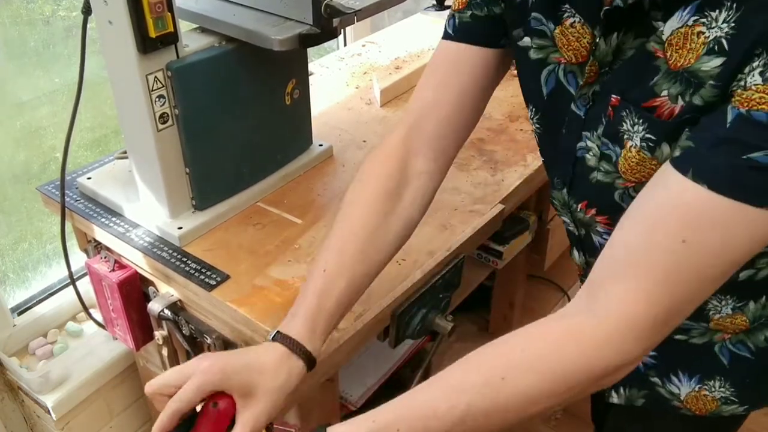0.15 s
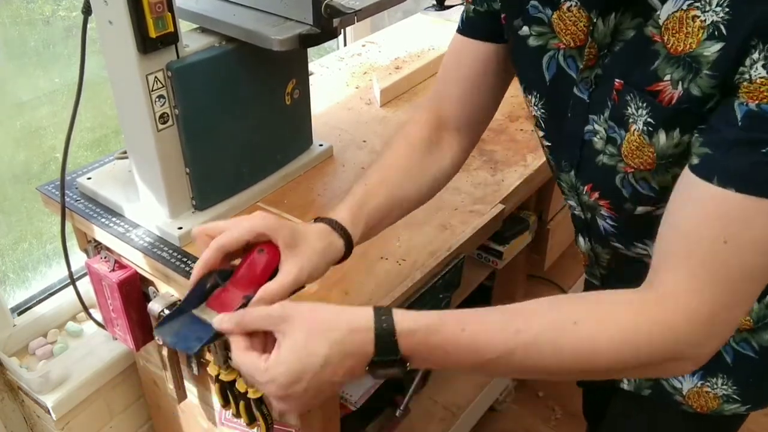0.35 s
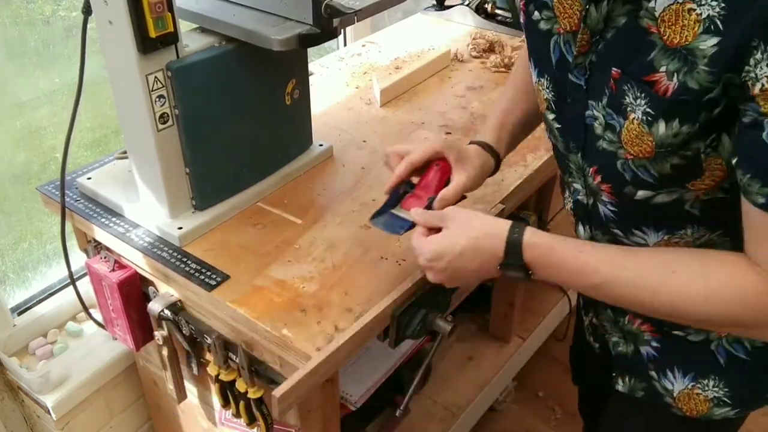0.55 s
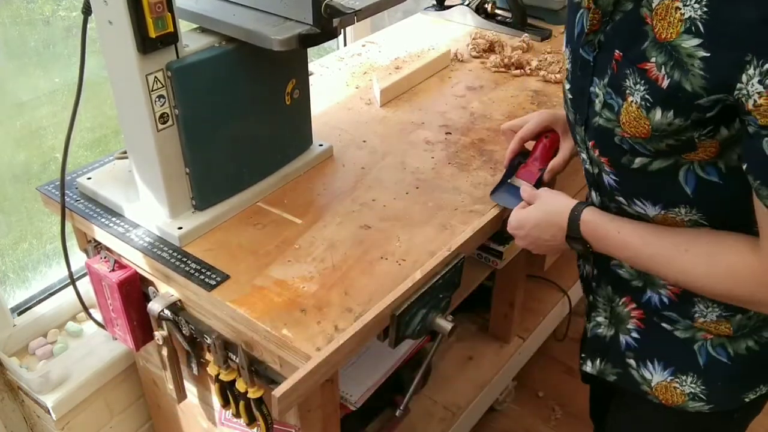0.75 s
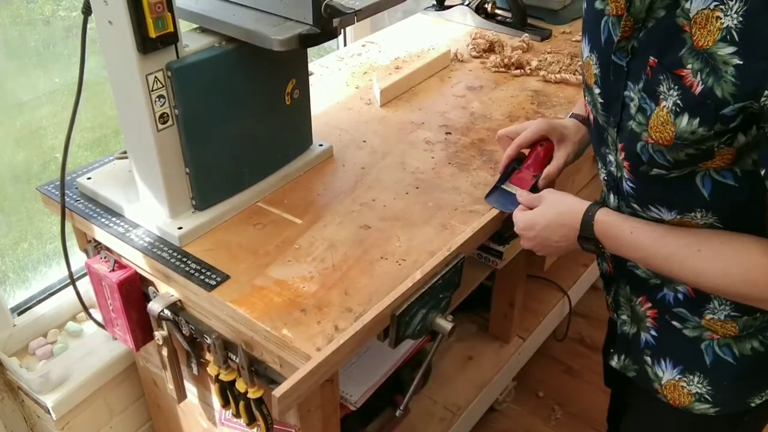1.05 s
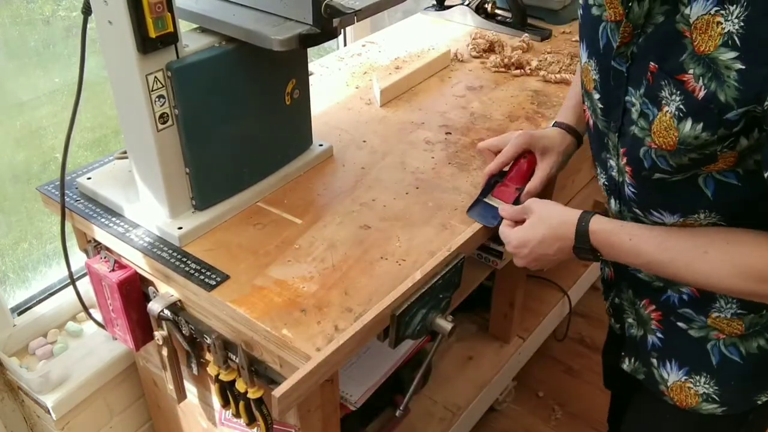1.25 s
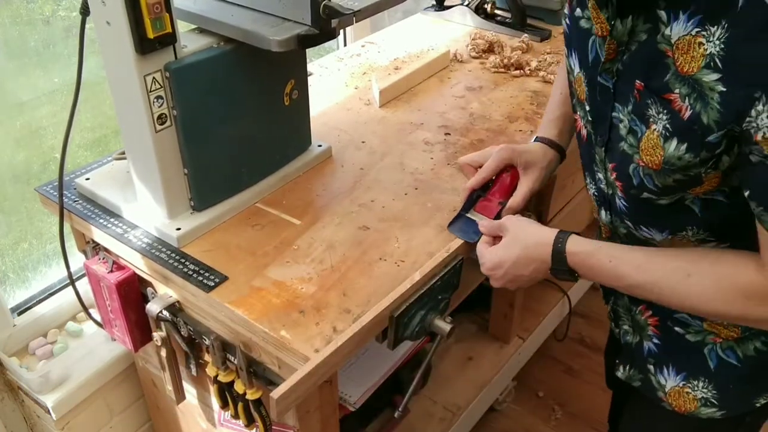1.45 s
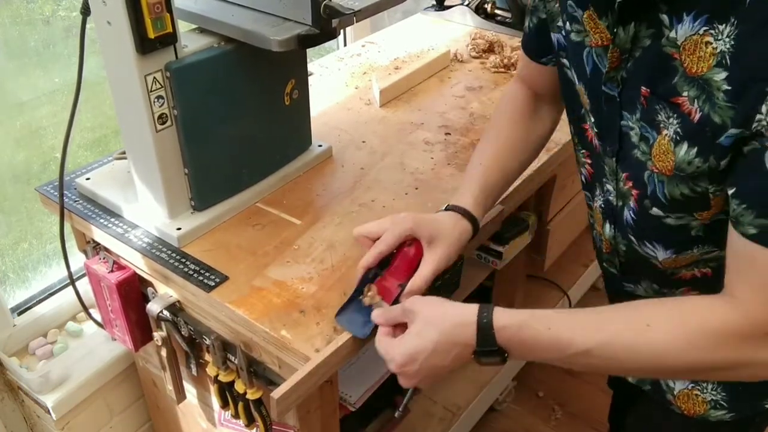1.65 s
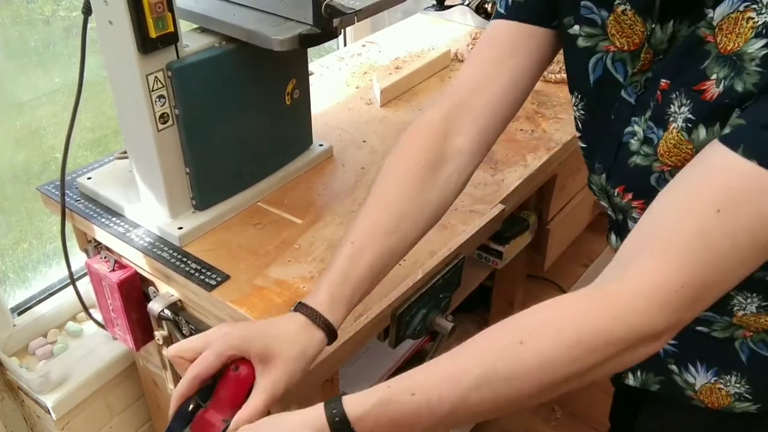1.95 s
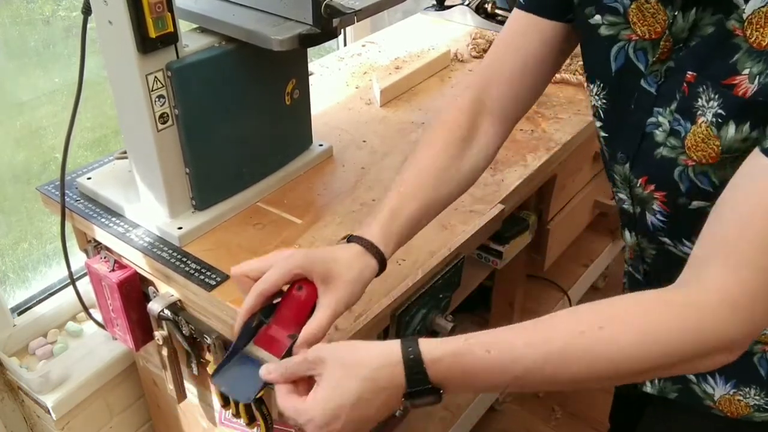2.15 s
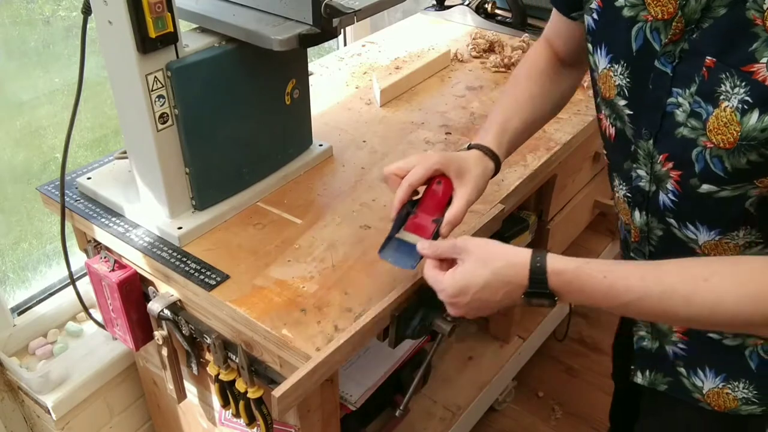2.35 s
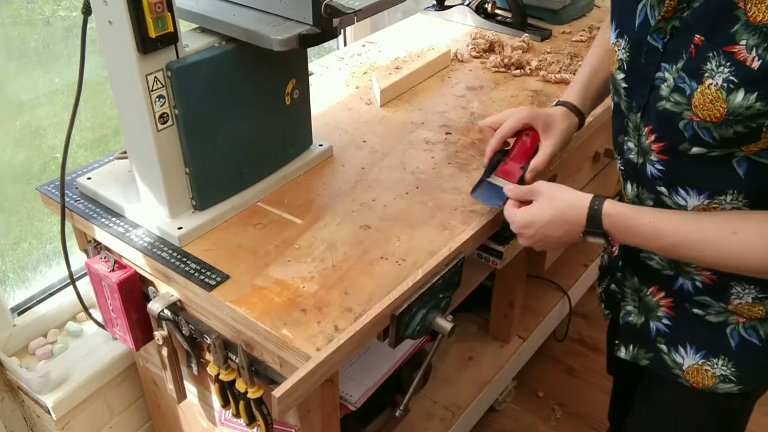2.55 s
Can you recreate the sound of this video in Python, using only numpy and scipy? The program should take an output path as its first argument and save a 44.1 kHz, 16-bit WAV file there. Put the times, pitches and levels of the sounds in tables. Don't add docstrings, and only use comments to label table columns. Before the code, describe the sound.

Close stereo view of a small workshop: the tail of a planing stroke, a cluster of hollow knocks, quiet rustling, a brief bite, a strong tearing swish, then near quiet over a faint low engine throb fading outside.

```python
import sys
import numpy as np
from scipy import signal
from scipy.fft import rfft, irfft, next_fast_len
from scipy.io import wavfile
from scipy.ndimage import uniform_filter1d

SR = 44100
rng = np.random.default_rng(int(sys.argv[2]) if len(sys.argv) > 2 else 0)


def store_wav(level_fs):
    pcm = np.round(np.clip(np.atleast_2d(level_fs), -1, 1) * 32767)
    wavfile.write(sys.argv[1], SR, pcm.T.astype(np.int16))


def attenuation_scalar(level_db):
    decades = np.asarray(level_db, float) / 20
    return 10 ** decades


N = 119070
T = np.arange(N) / SR

# start_s, cut_db, chatter_over_cut_db
STROKE_END = [
    (0, -20.5, -5.5),
    (.04, -32.5, -3.5),
    (.068, -36.5, 2),
    (.082, -30, 5),
    (.11, -34, -0.5),
    (.132, -34.5, 8.5),
    (.142, -47.5, 15.5),
    (.17, -55, 26.5),
]
NICK = [
    (1.27, -66.5, 10.5),
    (1.33, -54.5, 2),
    (1.383, -50, 6),
    (1.408, -28, -0.5),
    (1.428, -25, 4),
    (1.45, -31.5, 11.5),
    (1.49, -42.5, 5.5),
    (1.54, -49, 13.5),
]
FULL_STROKE = [
    (1.54, -42.5, 8),
    (1.577, -31.5, 10.5),
    (1.615, -18, -8),
    (1.675, -21, -1.5),
    (1.706, -17.5, -8.5),
    (1.78, -20.5, -6),
    (1.84, -19, -8),
    (1.923, -18.5, -8.5),
    (2, -32.5, 3),
]
# pitch_hz, level_db (per Hz)
FIBRE_COLOUR = [(240, -61.5), (400, -2), (535, -4), (1120, -17), (1450, -6), (2000, -8.5), (4700, -4),
                (12900, -12), (15500, -19)]
# pitch_hz, width_hz, then level_db at each of four grips
IRON_RINGS = [(1340, 140, 2.5, -12, -14.5, -20), (1438, 54, -11.5, -6, 8.5, -0.5),
              (1580, 200, -8.5, 9.5, -13.5, -12), (2485, 140, -6, -13.5, 1, -6.5),
              (2953, 92, -2, -15, 1.5, 3.5), (3934, 90, -12.5, 0, 3, 3), (4070, 140, 4.5, -3.5, -3.5, 1.5),
              (4188, 77, -2, -2.5, 1, 2.5), (4664, 140, 3, -1, -1, 3.5), (5680, 180, -9.5, -12, -12, -6),
              (5970, 100, -6, -2, 0, -6), (5980, 70, -13.5, 6, -9, -8.5), (10840, 600, -18, -8, -10, -15.5),
              (12900, 450, -19.5, -14.5, -13.5, -15)]
GRIP_TIMES = [.1, 1.43, 1.65, 1.87]
GRIP_SHEEN = [-2, 2.5, 2.5, 1.5]
# pitch_hz, level_db, t60_s
BOARD_MODES = [(175.1, -5.5, 0.16), (234.7, -7, 0.31), (256.9, -7, 0.27), (284, -11, 0.4),
               (320, -8.5, 0.12), (356, -7, 0.78), (460, -12.5, 0.069), (530, -13, 0.076), (598, -14, 0.14),
               (709.4, -13.5, 0.052), (807, -12.5, 0.041), (920, -20.5, 0.028), (1444, -16, 0.064),
               (1693, -21.5, 0.19)]
# start_s, peak_db, judder_hz,
# length_s
KNOCKS = [(.07, -29, 733, 0.055), (0.127, -3.5, 255, 0.025), (0.177, -11, 289.4, 0.023),
          (0.199, -21, 261, 0.039), (0.186, -32.5, 787, .035), (0.269, -20.5, 701, .08),
          (.29, -5, 257.4, 0.018), (0.313, -3.5, 301, 0.014), (0.325, -7.5, 244, .024),
          (0.343, -13.5, 381, 0.017), (0.364, -22, 313, 0.036), (0.41, -23.5, 266, 0.019),
          (0.856, -48, 327, 0.11), (1.084, -24.5, 260, 0.019), (1.102, -33.5, 312.5, 0.058),
          (1.3, -37, 286, 0.056), (1.395, -31, 765, .03), (1.423, -13.5, 234, 0.027),
          (1.435, -14, 536, 0.021), (1.44, -20.5, 975, 0.019), (1.445, -14, 169, 0.034),
          (1.557, -15, 241.4, 0.039), (1.575, -19, 530, 0.064), (1.91, -15, 510.7, 0.05),
          (1.931, -15.5, 911, 0.026), (1.94, -26, 313, 0.034), (2.252, -30, 320, 0.04),
          (2.452, -44, 320, 0.032), (2.513, -43, 320, 0.035),
          (0, -20, 356, 0.054), (0.006, -32, 55, 0.046), (1.445, -20.5, 74.6, .08), (1.553, -30, 101.4, .04),
         (1.784, -34.5, 92, 0.15), (1.968, -25, 60, 0.091), (2.041, -22.5, 356, 0.035),
         (2.289, -35, 269, 0.017), (1.715, -13, 248.3, 0.04), (1.752, -17.5, 236, 0.073),
         (.28, -19, 475, 0.076), (2.078, -32.5, 65, 0.13)]
# multiple of firing rate, level_db
ENGINE_PARTIALS = [(3, -15), (4, 6), (5, 0), (6, 3), (7, -12), (8, -21)]
# start_s, level_db
ENGINE_LEVEL = [
    (0, -32),
    (.6, -32.5),
    (1.3, -37),
    (2.1, -43),
    (2.7, -37),
]
# start_s, level_db, hold_s, centre_hz
RUSTLES = [(0.074, -38, 0.064, 1300), (0.144, -49, 0.077, 1640), (0.264, -40, 0.066, 1490),
           (0.263, -49, 0.088, 7250), (0.282, -40.5, 0.048, 4000), (0.311, -46, 0.048, 1620),
           (0.29, -37, 0.06, 606), (1.921, -25, 0.034, 702), (0.459, -51.5, 0.053, 8250),
           (0.578, -42, 0.029, 8650), (0.58, -44, 0.048, 4930), (0.583, -53.5, 0.062, 1070),
           (0.715, -50, 0.032, 9500), (0.771, -43, 0.029, 6100), (0.787, -56, 0.11, 930),
           (0.833, -56.5, 0.085, 4170), (0.889, -53.5, 0.014, 6030), (1.081, -50.5, .02, 650),
           (1.118, -57, .06, 758), (1.247, -63, 0.036, 900), (1.104, -62, 0.082, 4080),
           (1.297, -56, 0.21, 7700), (1.324, -57.5, 0.068, 800), (2.271, -67.5, 0.04, 800),
           (2.496, -53, 0.045, 7920), (2.481, -60.5, 0.055, 690), (2.683, -59, 0.021, 7470)]
# pitch_hz, level_db (per Hz)
AIR_COLOUR = [(12, -44.5), (20, -14), (106, -4.5), (323, -13.5), (416, -27), (833, -29.5), (1870, -43.5),
              (4680, -40), (15500, -52.5)]
# pitch_hz, level_db
SIDE_WIDTH = [(60, -22), (150, -27), (300, -16.5), (600, -7), (1400, 1.5), (2500, -0.5), (6000, 0.5),
              (14000, 0.5)]
# pitch_hz, level_db
PORT_BAND = [(60, -41), (250, -20), (500, -8), (1000, -7), (1450, -2.5), (2200, -12.5), (4000, -29)]
# pitch_hz, level_db
MIC_COLOUR = [(1500, 0), (2000, -4.5), (2600, 1.5), (3400, -2), (4500, 1.5), (6200, 0), (7400, -3.5),
              (11000, -1)]


def unit(x):
    return x / np.sqrt(np.mean(x ** 2))


def colour(x, points):
    size = next_fast_len(N + SR // 10)
    hz, db = np.array(points, float).T
    bins_hz = np.arange(size // 2 + 1) * SR / size
    gain = attenuation_scalar(np.interp(np.log(bins_hz + 1), np.log(hz), db))
    return irfft(rfft(x, size) * gain, size)[..., :N]


def ring(x, hz, t60):
    r = np.exp(-np.log(1000) / (t60 * SR))
    w = 2 * np.pi * hz / SR
    return signal.lfilter([0, r * np.sin(w)], [1, -2 * r * np.cos(w), r * r], x)


def walk(rate):
    k = int(SR / rate)
    steps = np.repeat(rng.standard_normal(N // k + 1), k)
    return unit(uniform_filter1d(uniform_filter1d(steps, k), k)[:N])


def clicks(per_s, spread_db):
    hits = rng.random(N) < per_s / SR
    return unit(hits * rng.standard_normal(N) * attenuation_scalar(spread_db * rng.exponential(size=N)))


def tail(t60, count):
    h = rng.standard_normal((count, SR // 2)) * np.exp(-np.log(1000) * T[:SR // 2] / t60)
    return h / np.sqrt((h ** 2).sum(1)[:, None])


def effort(chatter):
    out = 0
    for rows in (STROKE_END, NICK, FULL_STROKE):
        s, cut_db, share_db = np.array(rows, float).T
        moving = (T >= s[0]) * (T < s[-1])
        out = out + attenuation_scalar(np.interp(T, s, cut_db + share_db * chatter)) * moving
    return uniform_filter1d(out, size=200)


def iron(tear):
    out = 0
    for hz, width_hz, *grip_db in IRON_RINGS:
        gain = attenuation_scalar(np.interp(T, GRIP_TIMES, grip_db) + 2.5 * walk(11.88))
        out = out + gain * np.sqrt(width_hz) * unit(ring(tear, hz, 1.74 / width_hz))
    return out


def plane_body(direct):
    shift_db, shifts_per_s, t60_s = 5.5, 5.93, 0.034
    grips = np.array([attenuation_scalar(shift_db * walk(shifts_per_s)) for _ in range(5)])
    responses = tail(t60_s, count=5)[None, :, :SR // 10]
    body = signal.fftconvolve(direct[:, None], responses, axes=2)[..., :N]
    return (grips * body).sum(axis=1) / np.sqrt((grips ** 2).sum(axis=0))


def cut():
    fibres_per_s, spread_db, dry_share = 9000, 0.5, 0.51
    iron_db, sheen_from_hz = -0.5, 7600
    tear = np.array([clicks(fibres_per_s, spread_db) for _ in range(2)]) * attenuation_scalar(walk(40.03))
    ringing = iron(tear)
    direct = colour(tear, [(200, -45)] + list(FIBRE_COLOUR))
    direct = dry_share * direct + plane_body(direct)
    both = unit(direct) + attenuation_scalar(iron_db) * unit(ringing)
    dull = colour(both, [(sheen_from_hz / 1.3, 0), (sheen_from_hz * 0.91, -30)])
    sheen = (both - dull) * attenuation_scalar(np.interp(T, GRIP_TIMES, GRIP_SHEEN))
    return (dull + sheen) * effort(chatter=False)


def modes(force):
    out = 0
    for hz, db, t60 in BOARD_MODES:
        out = out + attenuation_scalar(db) * ring(force, hz, t60) * np.sqrt(4 * np.log(1000) / (t60 * SR))
    return out


def judders(rough):
    rough_from_hz = 977
    out = np.zeros(N + SR)
    for s, peak_db, hz, length in KNOCKS:
        t, i = T[:int(length * SR)], int(s * SR)
        uneven = 1 + min(hz / rough_from_hz, 1) ** 2 * np.roll(rough, -i)[:len(t)]
        swell = np.sin(np.pi * (t / length) ** 0.9) ** 1.57
        out[i:i + len(t)] += attenuation_scalar(peak_db) * swell * np.sin(2 * np.pi * hz * t) * uneven
    return out[:N]


def board():
    chatter_per_s, spread_db, chatter_hz = 2500, 1.5, 900
    knock_ring_db, knock_rough, low_hz = -5, 0.77, 132
    push = unit(signal.lfilter(*signal.butter(1, chatter_hz, fs=SR), clicks(chatter_per_s, spread_db)))
    rough = walk(400)
    judder = judders(rough)
    chatter = push * effort(chatter=True) / 2
    knock = attenuation_scalar(knock_ring_db) * judder * (1 + knock_rough * rough) / 10
    rung = modes(chatter + knock)
    return judder + signal.sosfilt(signal.butter(3, low_hz, "high", fs=SR, output="sos"), rung)


def engine():
    firing_hz, turn, fades_s, fade_db_s = 23.7, 0.62, 2.15, 30
    phase = 2 * np.pi * (firing_hz * T + turn)
    fade_db = fade_db_s * np.clip(T - fades_s, 0, None)
    hum = 0
    for i, (k, db) in enumerate(ENGINE_PARTIALS):
        hum = hum + attenuation_scalar(db + walk(4.8) - fade_db * (i != 1)) * np.cos(k * phase)
    return unit(hum) * attenuation_scalar(np.interp(T, *np.array(ENGINE_LEVEL).T))


def air():
    level_db, fade_db_s = -41.5, 2.5
    gain = attenuation_scalar(level_db - fade_db_s * T + walk(9))
    return gain * unit(colour(rng.standard_normal((2, N)), AIR_COLOUR))


def rustles():
    attack_s, t60_s = 0.0068, 0.19
    out, grain = np.zeros(N + SR), clicks(8000, 0.83)
    t = T[:SR // 2]
    for s, db, hold, hz in RUSTLES:
        release = attenuation_scalar(-60 * np.clip(t - hold, 0, None) / t60_s)
        shape = np.clip(t / attack_s, 0, 1) * release
        span = 1.15 if 1200 < hz < 1900 else 1.61
        edges_hz = [hz / span, min(hz * span, SR / 2.2)]
        band = signal.butter(2, edges_hz, "band", fs=SR, output="sos")
        i = int(s * SR)
        out[i:i + len(t)] += attenuation_scalar(db) * shape * unit(signal.sosfilt(band, np.roll(grain, -i)[:len(t)]))
    return out[:N] * attenuation_scalar(walk(76))


def workshop(sources):
    t60_s, level_db, tilt_db = 0.36, -7, -0.5
    wet = signal.fftconvolve(sources, tail(t60_s, count=2), axes=1)[:, :N]
    return colour(wet, [(200, -11.5), (500, 1), (1500, 3), (16000, 6 * tilt_db)]) * attenuation_scalar(level_db)


def scene():
    port_lead_rad = 1.2
    hiss, wood = cut(), board()
    near = hiss[0] + wood + rustles()
    other = hiss[1] + rustles()
    room = workshop(np.array([near, other + wood]))
    noise = air()
    mid = near + room[0] + noise[0] + engine()
    lead = np.real(signal.hilbert(mid) * np.exp(1j * port_lead_rad))
    side = colour(other + room[1] + noise[1], SIDE_WIDTH) + colour(lead, PORT_BAND)
    return np.array([mid + side, mid - side])


def roll_off(x):
    return signal.sosfilt(signal.butter(12, 15640, fs=SR, output="sos"), x)


def record(dry):
    low_hz, top_hz, limit = 66, 15650, 0.7
    starved_hz, starved_db = 14600, -28.5
    x = signal.sosfilt(signal.butter(2, low_hz, "high", fs=SR, output="sos"), colour(dry, MIC_COLOUR))
    x = np.tanh(limit * x) / limit
    x = signal.sosfilt(signal.ellip(8, .2, 70, top_hz, fs=SR, output="sos"), x)
    top = x - colour(x, [(starved_hz, 0), (starved_hz + 150, -60)])
    treble = colour(x, [(7000, -40), (9000, 0)])
    busy = uniform_filter1d(treble ** 2, size=6000).mean(axis=0)
    x = x - top * uniform_filter1d(1. * (busy > attenuation_scalar(2 * starved_db)), size=600)
    return roll_off(np.clip(x, -1, 1))


dry = scene()
out = record(dry)
store_wav(out)
```